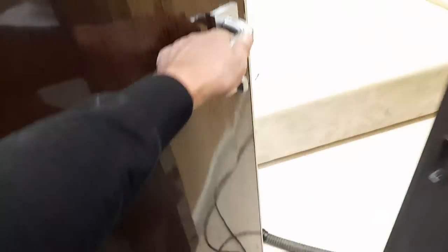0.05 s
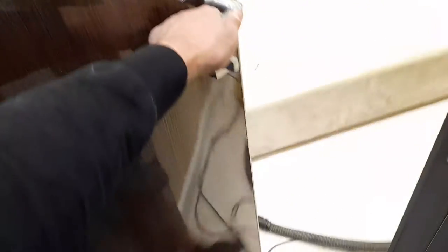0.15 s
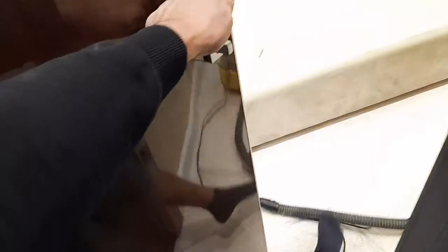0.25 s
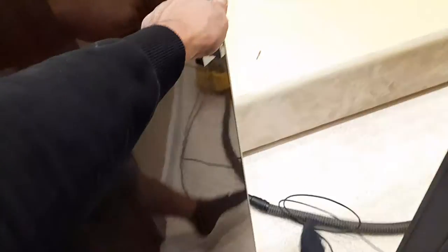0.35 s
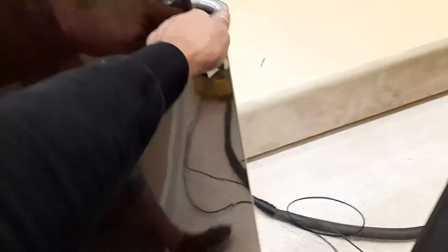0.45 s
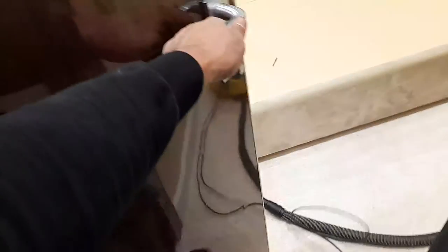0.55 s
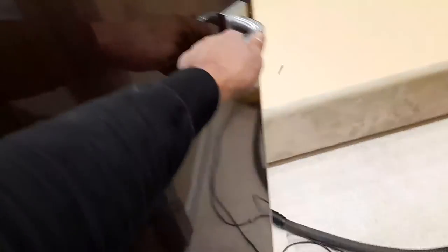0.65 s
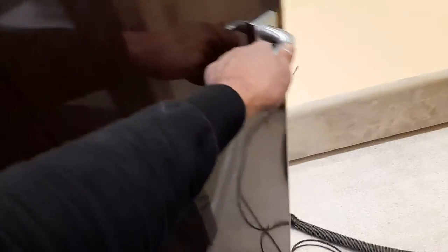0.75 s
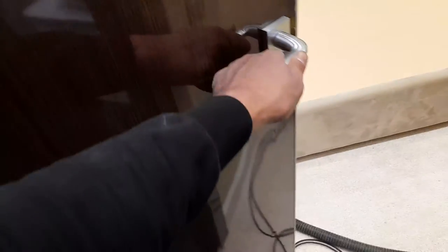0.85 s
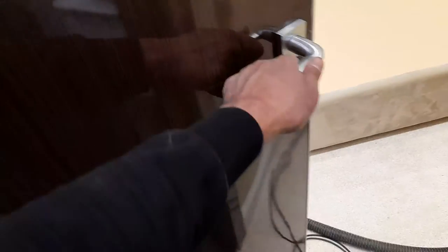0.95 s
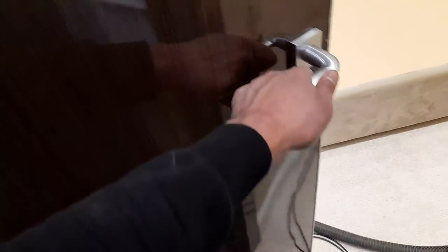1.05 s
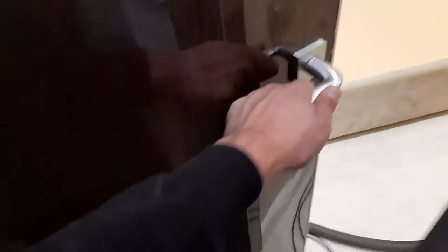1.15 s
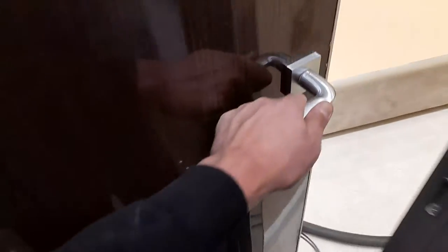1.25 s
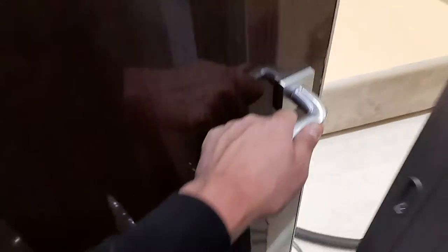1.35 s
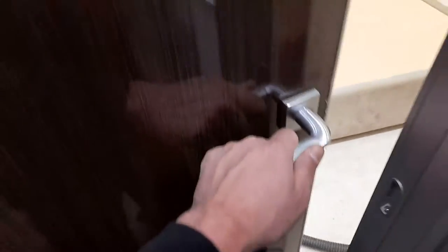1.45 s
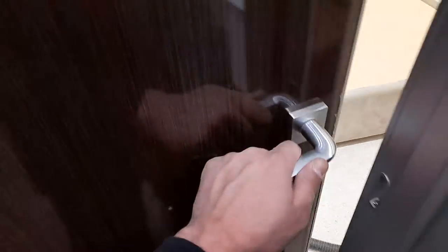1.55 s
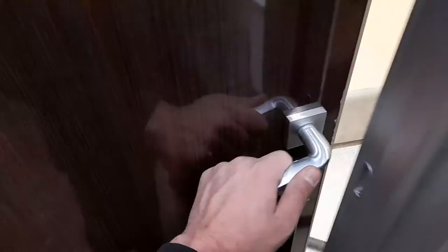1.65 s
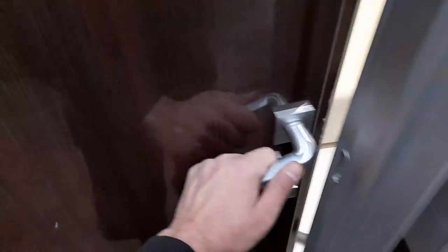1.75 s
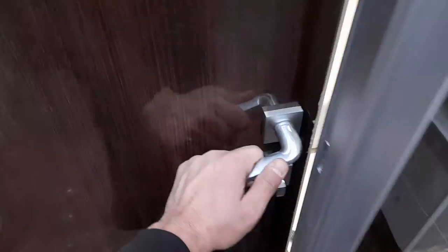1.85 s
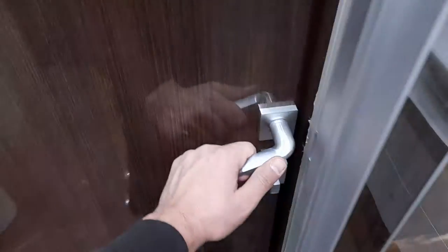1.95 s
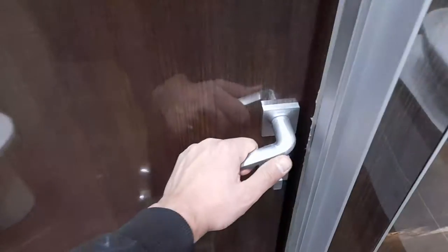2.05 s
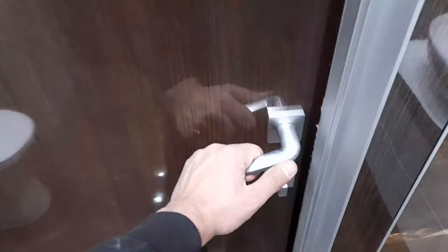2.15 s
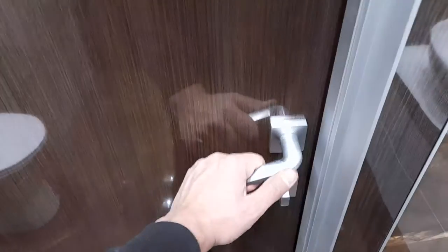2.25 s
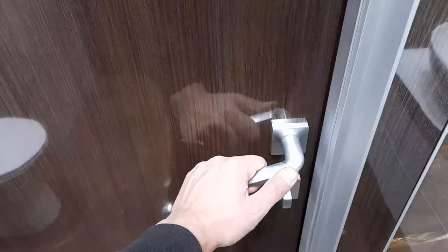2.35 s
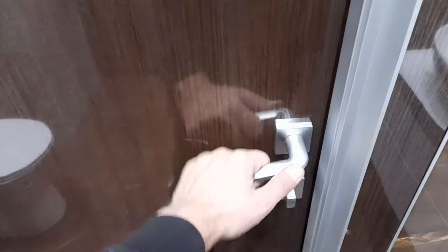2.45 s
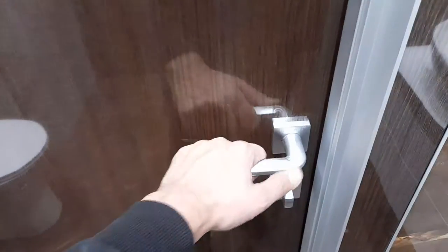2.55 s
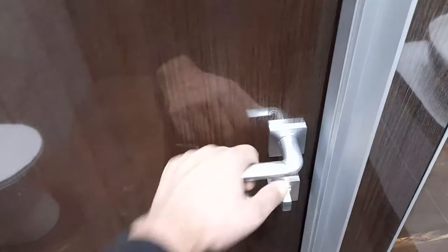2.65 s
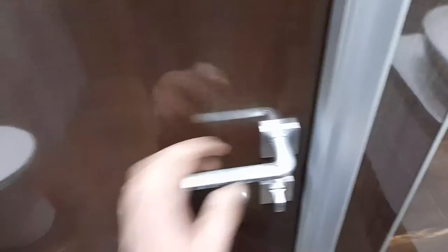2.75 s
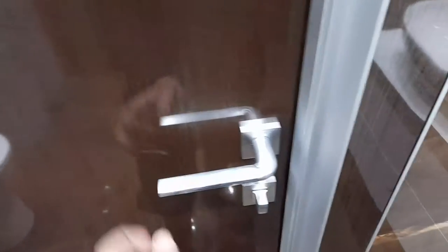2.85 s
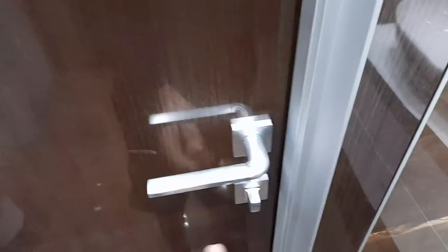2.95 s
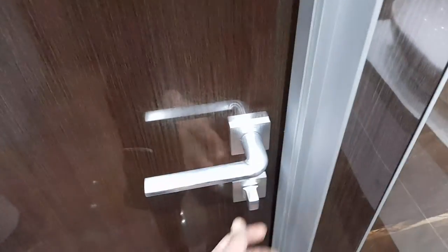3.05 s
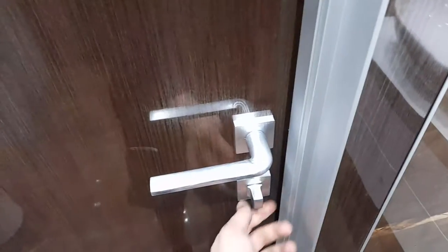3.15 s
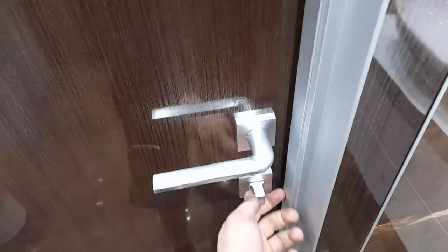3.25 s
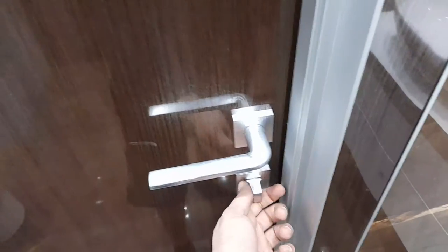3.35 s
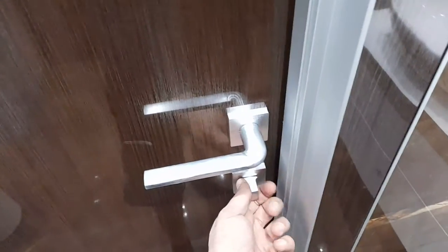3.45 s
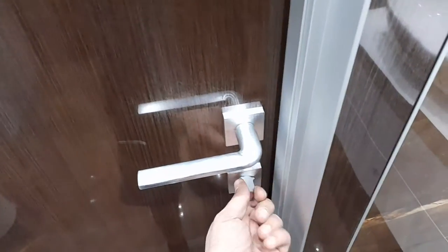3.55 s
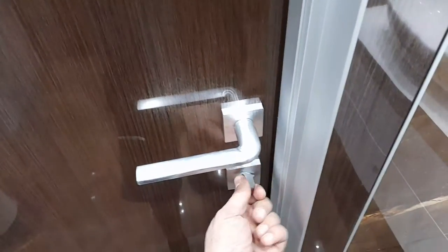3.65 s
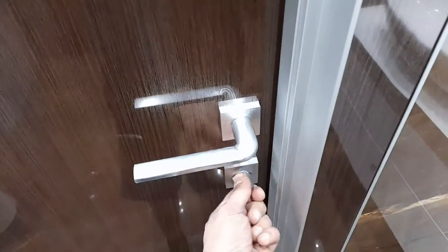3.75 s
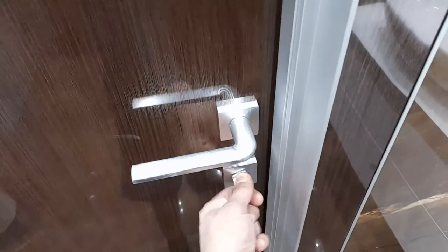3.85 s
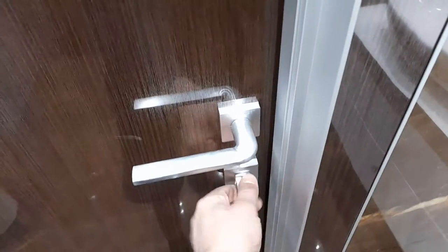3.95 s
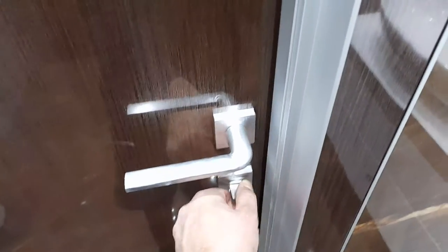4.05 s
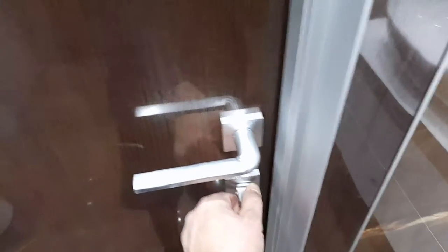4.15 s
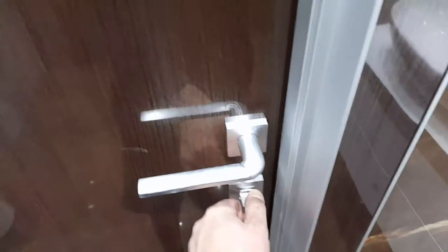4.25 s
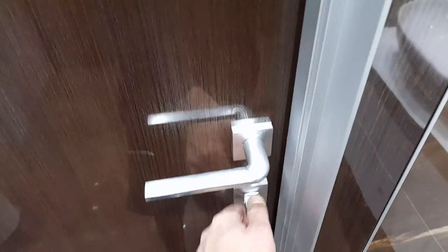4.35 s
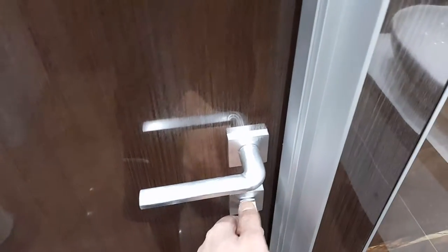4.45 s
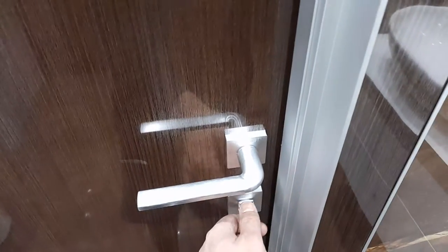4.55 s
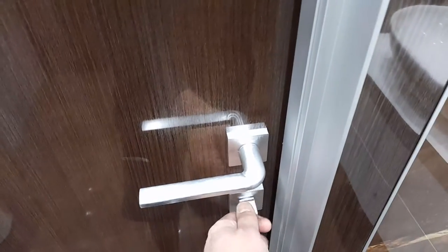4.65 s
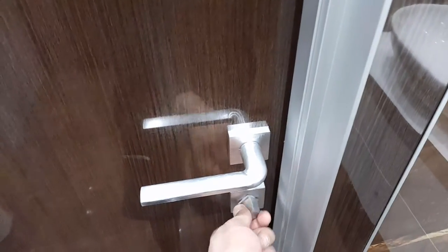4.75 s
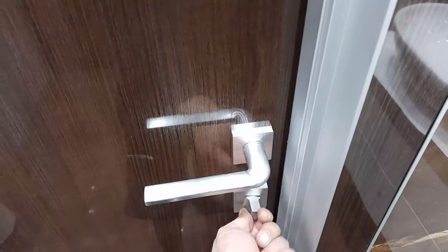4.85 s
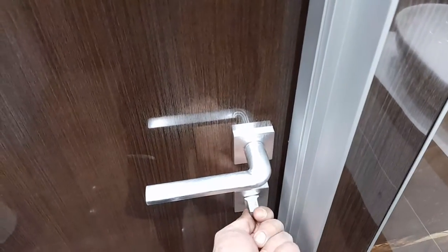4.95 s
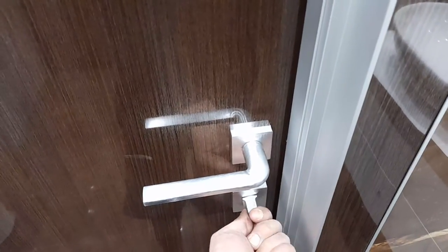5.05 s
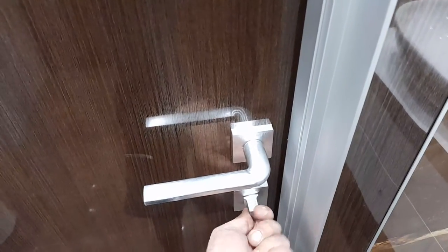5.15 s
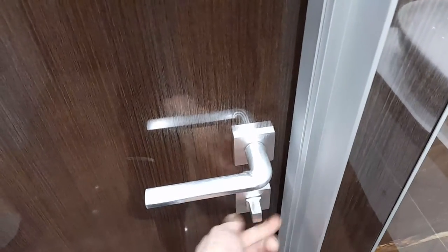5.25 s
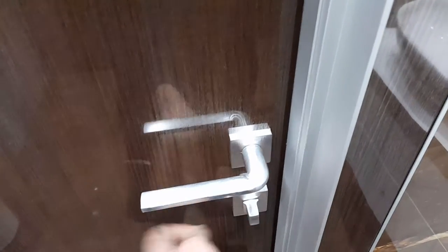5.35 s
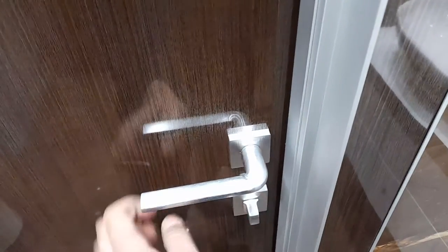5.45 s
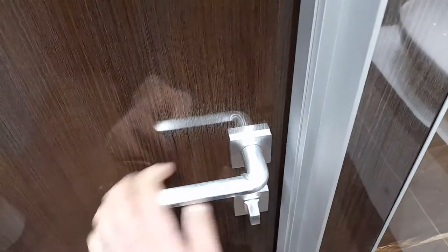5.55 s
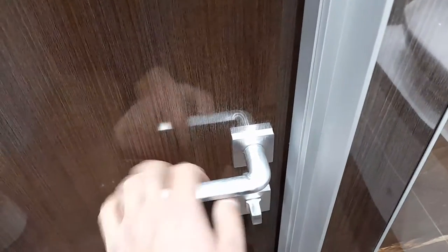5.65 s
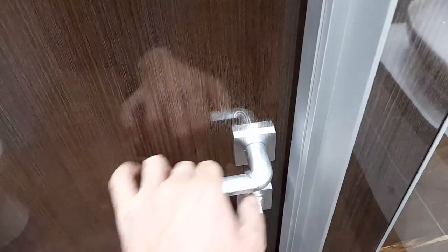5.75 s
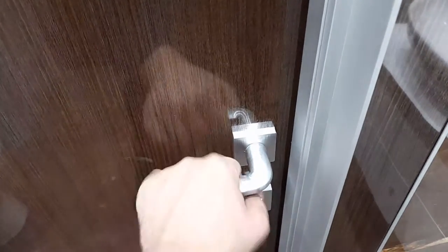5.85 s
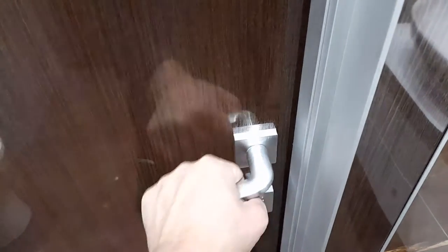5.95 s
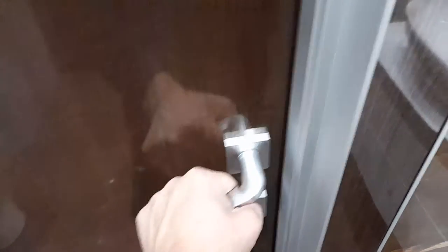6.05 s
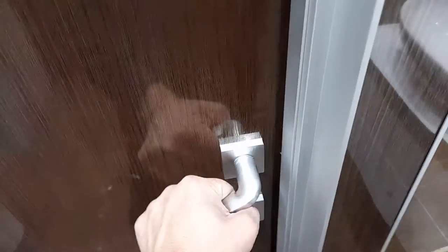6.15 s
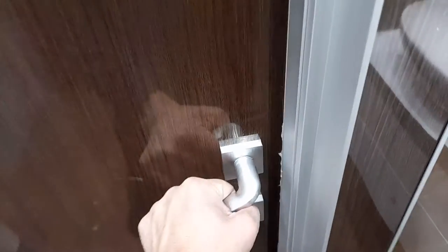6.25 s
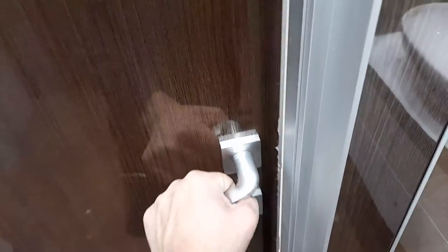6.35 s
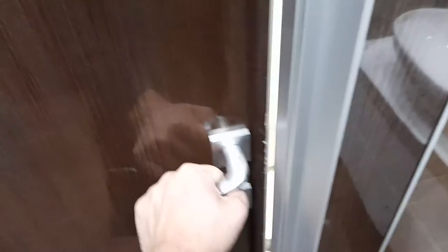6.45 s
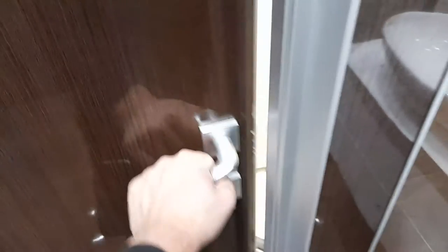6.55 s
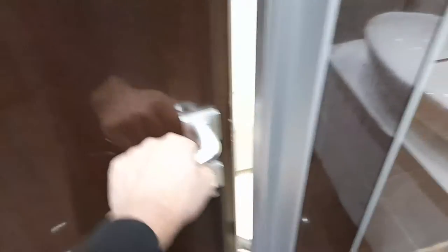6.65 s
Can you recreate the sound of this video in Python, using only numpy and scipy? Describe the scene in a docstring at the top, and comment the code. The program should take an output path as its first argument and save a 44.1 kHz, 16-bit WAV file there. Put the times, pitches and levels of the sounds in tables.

```python
"""In a small hard-walled room a lever handle is worked, the door is pushed shut with a thud, the thumb-turn
bolt is thrown to and fro and the door is opened again. Each metal contact is a burst of noise exciting broad
resonances; knocks excite decaying modes of the door leaf and pushes those of the enclosed air. Hand and latch
slide as grainy noise, small parts ping, and a long noisy reverberation answers over a quiet noise floor."""
import sys
import numpy as np
from scipy import signal
from scipy.fft import rfft, irfft
from scipy.io import wavfile
from scipy.ndimage import uniform_filter1d

SR = 44100
rng = np.random.default_rng(int(sys.argv[2]) if len(sys.argv) > 2 else 0)


def put_to_file(sound):
    """Save the sound as 16-bit audio at rate SR, in the file named by the first command-line argument."""
    columns = np.atleast_2d(sound).T  # one column per channel
    safe = np.clip(columns, -1, 1)
    whole_steps = np.round(safe * 32767)
    wavfile.write(sys.argv[1], SR, whole_steps.astype(np.int16))


def volts(x):
    """Linear amplitude factor 10**(x/20) for a level x in dB, scalar or array-like."""
    e = np.asarray(x, float) / 20
    return 10 ** e


N = 295749  # length in samples

# All levels are relative unless stated.
# Lever and latch contacts, then bolt contacts:
# [t/s, force level/dB, hardness/dB per part, tick level/dB, level into room/dB]
LEVER_CONTACTS = [(0.172,-31.5,7,-17,-34), (0.195,-50,-10,-23,1.5), (0.240,-39,15,-10.5,-15),
                  (0.331,-42,9.5,-27,-4), (0.349,-31,-1.3,-34,-11.5), (0.764,-33.5,8,-31,-3.5),
                  (0.786,-51.5,-13,-37,1), (0.891,-51,-4,-58,4), (0.924,-50,-2,-53,-7),
                  (1.642,-49.5,-2,-54,6.7), (1.899,-60,-1,-55,10.5), (2.193,-38.5,-8,-45,-1.5),
                  (2.220,-19,0,-19.5,2), (2.256,-48,2,-40,16.5), (2.307,-30,-1.5,-22,4.5),
                  (2.856,-48.5,-5,-58,3.5), (2.913,-38.5,-1.5,-52,7.5), (2.925,-31,5.5,-32,-9),
                  (2.964,-29.5,3,-31,-7.5), (3.229,-52,-16,-39,-5.5), (5.589,-49.5,6.5,-44,6),
                  (5.603,-47.5,-12.5,-36,-3), (5.775,-41,0,-44,-2), (5.899,-38,0.4,-41,-4),
                  (5.905,-28,1.2,-30,0.5), (5.955,-25.5,-1.5,-28,-6), (6.051,-23.5,-1.5,-44,-3)]
BOLT_CONTACTS = [(3.382,-34.5,-16.5,-58,-2.5), (3.434,-35.5,-13,-68,-3), (3.522,-34.5,-16,-59,5.5),
                 (3.554,-21.5,0.5,-12,-3.5), (3.646,-25,-8,-28,-1), (3.947,-26.5,-8,-16.5,-4.5),
                 (3.961,-17.5,-8,-20,0.5), (4.05,-30.5,-13.5,-51,-2), (4.359,-41,-15,-63,-2),
                 (4.659,-34,-11,-56,4.5), (4.720,-18.5,-9.5,-20.5,-1.5), (4.858,-32.5,-15,-61,3),
                 (4.933,-33,1.5,-21.5,0.5), (5.184,-25.5,-10,-65,-4.5)]
# Resonances of the metal, one list each for clack, snap and edge: [f/Hz, width/Hz, level/dB]
LEVER_BODY = ([(910, 1250, -0.5), (1382, 1030, -1)], [(2147, 620, -1.5), (2900, 240, 0), (3300, 590, -5.5)],
               [(3920, 630, -15), (4650, 590, 1), (4870, 2450, -1.5), (6690, 1200, -2)])
BOLT_BODY = ([(818, 193, -6), (1035, 56, 0), (1187, 190, 2), (1278, 292, 0.5), (1657, 193, -9.5)],
              [(2122, 770, -2), (2456, 325, 5.5), (2603, 313, 3), (3333, 840, -7)], [(3890, 490, -2),
              (5500, 1450, -0.1), (6820, 970, 1.3)])
# Response of clack, snap and edge to a contact of hardness zero: [level/dB of each]
LEVER_PARTS_DB = [29.5, 27, 22.5]
BOLT_PARTS_DB = [27.5, 29.5, 22]
LEVER_TOUCH_S, BOLT_TOUCH_S = 0.003, 0.003  # decay constants of clack and snap
SHARP_S = 0.0009  # decay constant of edge and tick: the bright part is over sooner

# Small latch parts that tick with a pitch: [t/s, f/Hz, level/dB]
PINGS = [(0.173, 3970, -26.5), (0.174, 2900, -33), (0.241, 5030, -43), (0.349, 3460, -36),
         (2.221, 4000, -20.5), (5.906, 3270, -26), (5.956, 5240, -32.5), (6.052, 2360, -18),
         (6.053, 4400, -27)]
PING_T60_S, PING_ROOM_DB = 0.013, -2  # the T60 holds once the door is shut
# Door modes driven extra by the bolt: [f/Hz, level/dB, T60/s with the door shut]
BOLT_DOOR_MODES = [(377.9, 4.5, 0.33), (553, -29, 0.43)]
BOLT_DOOR_DB = -24

# Knocks of hand, lever and frame on the door: [t/s, knock level/dB, thump level/dB, flex level/dB]
KNOCKS = [(0.174,-39.5,-41.5,-59), (0.213,-42,-54,-72), (0.355,-43.5,-48.5,-72), (0.763,-37,-45,-43),
          (0.797,-56,-62,-39), (0.889,-37,-74,-41), (0.921,-42,-56,-42), (1.64,-33.5,-45,-35),
          (2.223,-27,-48,-52), (2.257,-17,-14,-8), (2.275,-39,-30,-28), (2.293,-23.5,-26,-16.5),
          (2.886,-44,-36.5,-39), (2.917,-40.5,-38,-51), (2.964,-31.5,-39,-32), (3.228,-45.5,-54,-60),
          (5.515,-74,-46.5,-41), (5.604,-38.5,-40,-43.5), (5.658,-75,-46,-37.5), (5.775,-46,-46,-37.5),
          (5.904,-29,-30.5,-31.5), (5.955,-27.5,-38,-28.5), (6.05,-46,-61,-40.5), (6.190,-37,-40,-64),
          (6.359,-43,-36.5,-71), (6.421,-66,-72,-70)]
# Share of a bolt contact passed into the door: [level/dB for knock, thump, flex]
BOLT_INTO_DOOR_DB = [-15, -22.5, -16.5]
# Growth of each as the contact softens: [dB per dB of hardness lost, for knock, thump, flex]
BOLT_SOFT_SHARE = [1, 0.63, 0.12]
# Modes of the panel (thump list, knock list), of the flexing leaf and of the air between the walls:
# [f/Hz, level/dB, T60/s with the door shut]
PANEL = ([(172.2, 4, 0.22), (223.5, -2.5, 0.56), (280.4, -1, 0.6)], [(314, -5.5, 0.94), (374.2, 3, 0.32),
          (474, -15, .5), (518, -2, 0.28), (578.7, -6, 0.27)])
FLEX = [(94.5, -1.5, 0.69), (101.45, 6.5, 0.3), (113.6, -5.5, 0.28), (138.4, -5, 0.69)]
SWAY = [(44, -17, 0.32), (57.35, -2, 1), (77.6, -12, 1)]
# Moments when the leaf stops and pumps the room air: [t/s, level/dB]
AIR_PUSHES = [(1.641, -52), (2.277, -14), (6.053, -35.5)]
SWAY_OPEN_DB, SWAY_SHUT_DB = -34, -11.5  # boom relative to flex, before and after shutting
SHUT_S = 2.15  # excitation before this time meets an open doorway
OPEN_RING = 0.69  # share of each T60 left while the doorway lets sound out

# Hand and latch sliding, one curve per movement: [t/s, rustle level/dB, rumble level/dB]
SLIDING = [
    [(0.0, -54.5, -59.5), (0.226, -42.5, -60), (0.292, -50.5, -57), (0.35, -52.5, -62), (0.45, -77, -68),
     (0.55, -64, -91)],
    [(0.6, -66, -71), (0.738, -65, -59), (0.868, -57, -74), (0.928, -69, -53), (0.998, -67, -93)],
    [(1.7, -62, -52), (1.806, -65, -47.5), (1.864, -69.5, -60), (2.014, -72.5, -56), (2.2, -59.5, -68)],
    [(2.6, -50.5, -39), (2.672, -62, -61.5), (2.742, -62.5, -106), (2.904, -66, -47), (3.036, -48, -70),
     (3.216, -75, -111)],
    [(5.45, -69, -76), (5.616, -64, -65), (5.79, -70.5, -82), (5.96, -43.5, -63), (6.066, -46.5, -36.5),
     (6.124, -68, -54), (6.296, -85, -66), (6.386, -85, -66), (6.552, -77, -84), (6.7, -68.5, -93)],
]
# Spectrum shape of the rustle: [f/Hz, level/dB per Hz]
RUSTLE = [(410, -37), (700, 0), (752, 10), (1730, 9.5), (3160, 7.5), (6080, 4), (8000, -61), (10400, -105),
          (17600, -120)]
# Skin brushing over the lever: [start t/s, length/s, level/dB]
BRUSHES = [(0.0, 0.17, -65.5), (0.34, 0.15, -72), (2.67, .08, -68), (5.62, 0.067, -62), (5.8, 0.08, -61.5)]
BRUSH_RISE_DB_S, BRUSH_FALL_DB_S = 188, 246
# Latch tongue squeaking along the strike plate: [start t/s, length/s, level/dB]
SQUEAKS = [(2.11, 0.11, -58), (2.84, 0.11, -58)]
# Resonance of the squeak: [f/Hz, width/Hz, level/dB]
SQUEAK_BODY = [(2110, 330, 0)]
SQUEAK_RISE_DB_S, SQUEAK_FALL_DB_S = 483, 710

# Reverberation with the door shut: [f/Hz, T60/s]
ROOM_T60 = [(200, 0.94), (450, 1), (760, 0.59), (1200, 0.97), (1800, 0.87), (2500, 0.7), (3800, 0.75),
            (6000, 0.64), (12000, 0.4)]
# Correlation of left and right in diffuse noise: [f/Hz, likeness from -1 to 1]
LIKENESS = [(60, 0.38), (250, 0.9), (500, 0.38), (1000, -0.14), (2000, 0.064), (4000, 0.025), (8000, -0.33),
            (14000, 0.12)]
# Spectrum shape of the noise floor: [f/Hz, level/dB per Hz]
FLOOR = [(18, -37), (30, 6.5), (90, 12), (170, 6), (404, 7.5), (1160, -9.5), (1760, 4), (3060, -9),
         (5740, 7.5), (6900, -20), (8300, -41), (13000, 2), (16000, -15)]
FLOOR_DB = -71  # rms of the floor in the dry mix
# Difference in colour of the two microphones: [f/Hz, left minus right level/dB]
LEANING = [(60, -1), (180, -1), (550, 0), (1650, -1.5), (4970, -5.5), (15000, 6.5)]
EDGES = 40 * 2 ** np.arange(0, 9, 0.5)  # half-octave band edges, f/Hz


def lock(contacts, body, parts_db, tau_s):
    """Impact excitation of resonators: returns the direct metal sound and the blow sent into the room."""
    s, force_db, hardness_db, tick_db, room_db = np.transpose(contacts)
    sign = rng.choice([-1, 1], (len(s), 4))

    def clack(x):
        return resonate(x, body[0])

    def snap(x):
        return resonate(x, body[1])

    def edge(x):
        return band(resonate(x, body[2]), 3530, 7960, order=3)

    def tick(x):
        return band(x, 8600, 14400) + volts(-14) * band(x, 7150, 9260)

    colours = [clack, snap, edge, tick]
    # a harder contact favours the edge over the clack
    parts = [force_db + db + (k - 1) * hardness_db for k, db in enumerate(parts_db)]
    levels = volts(parts + [tick_db])
    taus = [tau_s, tau_s, SHARP_S, SHARP_S]
    straight, send = 0, 0
    for colour, gain, tau in zip(colours, levels, taus):
        straight = straight + colour(bursts(s, gain, tau))
    for colour, gain, flip in zip(colours, levels, sign.T):
        send = send + colour(spikes(s, gain * volts(room_db) * flip))
    return straight, send


def bursts(times, gains, tau_s):
    """Contact chatter: unit-energy noise under an exponential decay, scaled for each contact."""
    length = 1000
    out = np.zeros(N + length)
    decay = np.exp(-np.arange(length) / (tau_s * SR))
    chatter = rng.standard_normal((len(times), length)) * decay
    for s, gain, shape in zip(times, gains, chatter):
        start = round(s * SR)
        out[start:start + length] += gain * shape / np.sqrt(np.sum(shape ** 2))
    return out[:N]


def latch_pings():
    """Free vibration of small latch parts: each impulse starts one briefly ringing mode."""
    return sum(ring(spikes(np.array([s]), volts(db)), [(hz, 0, PING_T60_S)]) for s, hz, db in PINGS)


def bolt_door_hum():
    """Modal hum of the door under the bolt's contacts, stronger for softer ones."""
    s, force_db, hardness_db, _, room_db = np.transpose(BOLT_CONTACTS)
    gains = volts(force_db - hardness_db + room_db + BOLT_DOOR_DB)
    return band(strike(s, gains, BOLT_DOOR_MODES, spread_db=3.0), 306, 800)


def door():
    """Modal vibration of a struck plate: returns its ring, the dull blows and the boom of the air."""
    softness = np.array(BOLT_SOFT_SHARE)
    from_bolt = []
    for s, force, hard, _, wet in BOLT_CONTACTS:
        from_bolt.append((s, *(force - hard * softness + wet + BOLT_INTO_DOOR_DB)))
    s, knock_db, thump_db, flex_db = np.transpose(KNOCKS + from_bolt)

    sway_db = np.where(s < SHUT_S, SWAY_OPEN_DB, SWAY_SHUT_DB)
    push_s, push_db = np.transpose(AIR_PUSHES)
    pushes = spikes(s, volts(flex_db + sway_db)) + spikes(push_s, volts(push_db))

    sign = rng.choice([-1, 1], (len(s), 2))
    knock_blows = band(spikes(s, sign[:, 0] * volts(knock_db + 5)), 273, 692)
    thump_blows = band(spikes(s, sign[:, 1] * volts(thump_db + 10.5)), 170, 285)
    blows = knock_blows + thump_blows

    knock = band(strike(s, volts(knock_db - 14.5), PANEL[1], spread_db=2.0), 266, 710)
    thump = band(strike(s, volts(thump_db - 15), PANEL[0], spread_db=-3.5), 95, 363)
    flex = band(strike(s, volts(flex_db - 10.0), FLEX, spread_db=3.0), 40, 180)
    boom = band(ring(pushes, SWAY), 31, 120)
    return knock + thump + flex + volts(23.0) * blows, blows, boom


def strike(times, gains, modes, spread_db):
    """Modal participation: each knock lands on another spot and drives every mode by its own amount."""
    spot = volts(spread_db * rng.standard_normal((len(times), len(modes))))
    out = 0
    for k, mode in enumerate(modes):
        out = out + (-1) ** k * ring(spikes(times, gains * spot[:, k]), [mode])
    return out


def sliding():
    """Dry friction: returns grainy rubbing with brushes and squeaks, and the drag that shakes the panel."""
    quiet = [-110, -110]
    rows = []
    for curve in SLIDING:
        rows += [(curve[0][0] - 0.02, *quiet)] + list(curve) + [(curve[-1][0] + 0.045, *quiet)]
    rows = np.array(rows)
    t = np.arange(N) / SR
    rustle_db, rumble_db = (np.interp(t, rows[:, 0], column) for column in rows.T[1:])

    # on average 400 grains per second, of uneven strength
    strength = volts(6 * np.minimum(rng.exponential(1, N), 3))
    grains = uniform_filter1d(strength * (rng.random(N) < 400 / SR), size=60)
    grains = 1 + 0.54 * rms_one(grains)

    rustle = rms_one(stereo_bands(N, lambda hz: volts(at_hz(RUSTLE, hz))) * grains)
    hiss = rms_one(band(rng.standard_normal((2, N)), 9500, 15500) * grains)
    squeak = rms_one(resonate(resonate(rng.standard_normal((2, N)), SQUEAK_BODY), SQUEAK_BODY))
    rubbing = rustle * volts(rustle_db)
    rubbing = rubbing + hiss * swells(BRUSHES, BRUSH_RISE_DB_S, BRUSH_FALL_DB_S)
    rubbing = rubbing + squeak * swells(SQUEAKS, SQUEAK_RISE_DB_S, SQUEAK_FALL_DB_S)

    damped_modes = [(hz, db, 0.15 * t60) for hz, db, t60 in PANEL[0] + PANEL[1]]
    drag = rms_one(ring(band(rng.standard_normal(N), 77, 1280), damped_modes))
    return rubbing, drag * volts(rumble_db)


def swells(rows, rise_db_s, fall_db_s):
    """Exponential envelopes: gain rises to each start, holds for the length and decays."""
    t = np.arange(N) / SR
    out = 0
    for s, length, db in rows:
        rise = rise_db_s * np.maximum(s - t, 0)
        fall = fall_db_s * np.maximum(t - s - length, 0)
        out = out + volts(db - rise - fall)
    return out


def room(x, onset_s):
    """Diffuse reverberation: dense noise decays in each band, faster for sound made before the door shuts."""
    t = np.arange(round(1.2 * SR)) / SR
    is_open = np.arange(N) < SHUT_S * SR
    answer = stereo_bands(len(t), lambda hz: volts(-60 * t / at_hz(ROOM_T60, hz)))
    answer = answer * (1 - np.exp(-(t / onset_s) ** 2))  # brief build-up
    answer /= np.sqrt(np.sum(answer ** 2) / 2)
    out = 0
    for part, leak_db_s in ((is_open, 30), (~is_open, 0)):
        leaking = answer * volts(-leak_db_s * t)
        out = out + signal.fftconvolve((x * part)[None], leaking, axes=1)[:, :N]
    return out


def noise_floor():
    """Stationary random noise with a fixed spectrum."""
    return volts(FLOOR_DB) * rms_one(stereo_bands(N, lambda hz: volts(at_hz(FLOOR, hz))))


def stereo_bands(length, gain_at):
    """Partial coherence: half-octave noise bands, each with its own gain and left-right correlation."""
    out = 0
    white = rng.standard_normal((2, 2, length))
    for k, (low, high) in enumerate(zip(EDGES, EDGES[1:])):
        mid, side = band(white[k % 2], low, high)
        hz = np.sqrt(low * high)
        alike = np.clip(at_hz(LIKENESS, hz), -1, 1)
        pair = np.sqrt(1 + alike) * mid + np.sqrt(1 - alike) * side * [[1], [-1]]
        out = out + gain_at(hz) * pair
    return out


def ring(clicks, modes):
    """Damped oscillators in parallel; excitation before the door shuts decays sooner."""
    out = 0
    is_open = np.arange(N) < SHUT_S * SR
    for k, (hz, db, t60) in enumerate(modes):
        w = 2 * np.pi * hz / SR
        for part, share in ((is_open, OPEN_RING), (~is_open, 1)):
            r = volts(-60 / (share * t60 * SR))
            feed = [0, volts(db) * np.sin(w)]
            back = [1, -2 * r * np.cos(w), r * r]
            out = out + (-1) ** k * signal.lfilter(feed, back, clicks * part + 1e-18)
    return out


def resonate(x, body):
    """Broad two-pole resonances in parallel, with alternating signs."""
    out = 0
    for k, (hz, width_hz, db) in enumerate(body):
        r = np.exp(-np.pi * width_hz / SR)
        feed = [(1 - r * r) / 2, 0, (r * r - 1) / 2]
        back = [1, -2 * r * np.cos(2 * np.pi * hz / SR), r * r]
        out = out + (-1) ** k * volts(db) * signal.lfilter(feed, back, x + 1e-18)
    return out


def spikes(times, gains):
    """Impulse excitation: one single-sample click per time."""
    out = np.zeros(N)
    out[np.round(times * SR).astype(int)] = gains
    return out


def band(x, low_hz, high_hz, order=2):
    """Butterworth band-pass filtering."""
    sos = signal.butter(order, [low_hz, high_hz], "band", fs=SR, output="sos")
    return signal.sosfilt(sos, x + 1e-18)


def rms_one(x):
    """Normalisation to unit rms."""
    return x / np.sqrt(np.mean(x ** 2) + 1e-20)


def at_hz(points, hz):
    """Linear interpolation of a table on a log-frequency axis."""
    points = np.array(points)
    return np.interp(np.log(hz), np.log(points[:, 0]), points[:, 1])


def scene():
    """Superposition of direct sound, reverberation and noise floor."""
    lever, lever_send = lock(LEVER_CONTACTS, LEVER_BODY, LEVER_PARTS_DB, tau_s=LEVER_TOUCH_S)
    bolt, bolt_send = lock(BOLT_CONTACTS, BOLT_BODY, BOLT_PARTS_DB, tau_s=BOLT_TOUCH_S)
    rubbing, drag = sliding()
    wood, blows, boom = door()
    pings, hum = latch_pings(), bolt_door_hum()

    send = volts(PING_ROOM_DB) * pings + volts(6.5) * (lever_send + bolt_send)
    send = send + volts(32.0) * blows + volts(-3.5) * (wood + drag)
    floor = noise_floor()
    # left lags by two samples, which widens the treble of the metal
    metal = np.array([np.roll(lever + bolt, 2), lever + bolt])
    direct = metal + pings + hum + wood + boom + drag
    return direct + room(send, onset_s=0.00057) + rubbing + floor


def low_pass(x):
    """Removes everything above the highest recorded frequency."""
    return signal.sosfilt(signal.butter(12, 16640, fs=SR, output="sos"), x)


def record(dry):
    """Linear filtering: two microphones of different colour, with the top cut at 16.2 kHz."""
    hz = np.maximum(np.fft.rfftfreq(N, 1 / SR), 1)
    lean = volts(at_hz(LEANING, hz) * np.array([[0.5], [-0.5]])) * (hz < 16200)
    mix = irfft(rfft(dry) * lean, N)
    return low_pass(mix)


dry = scene()
out = record(dry)
put_to_file(out)
```